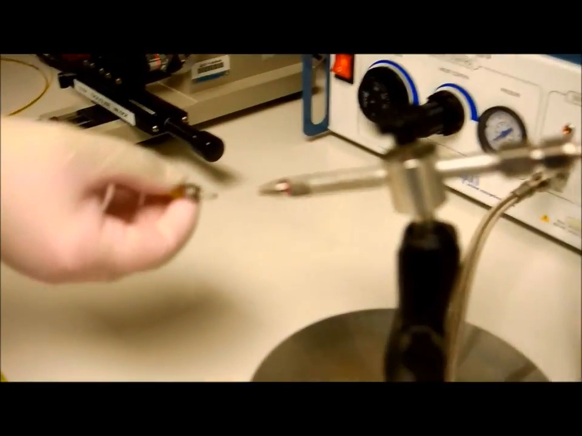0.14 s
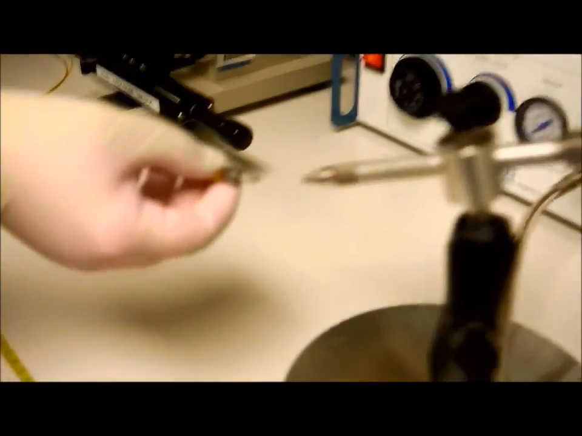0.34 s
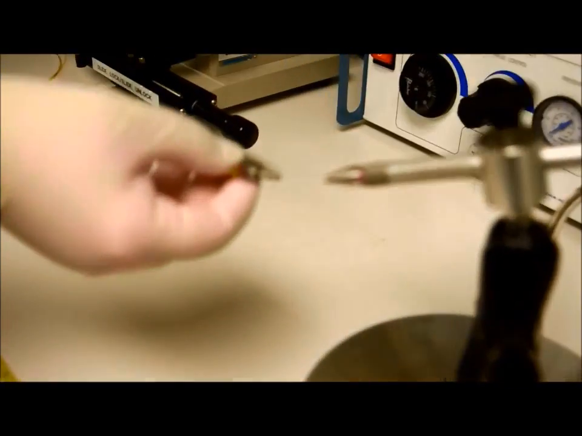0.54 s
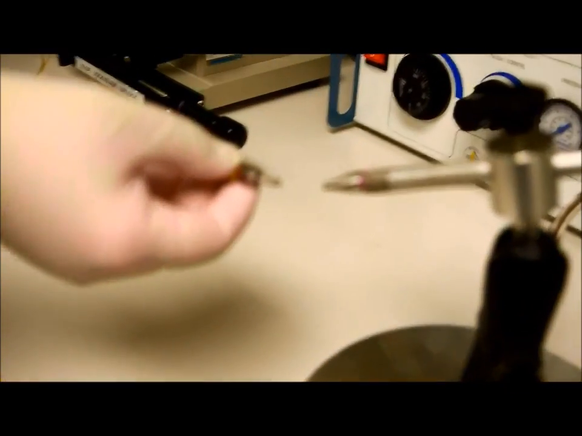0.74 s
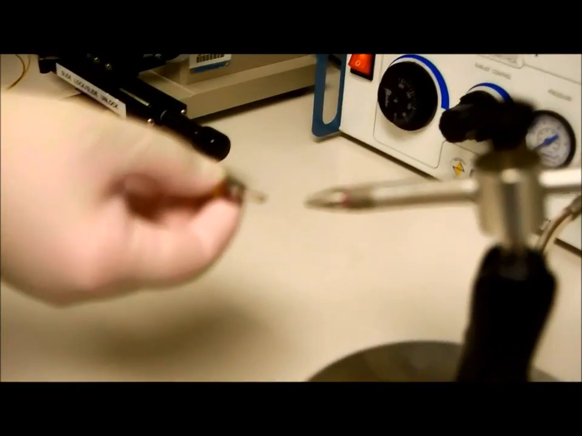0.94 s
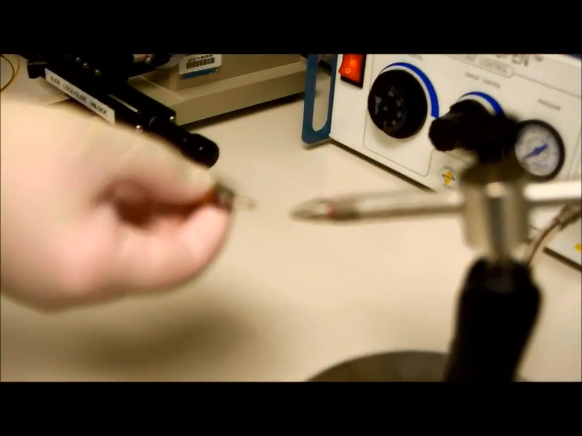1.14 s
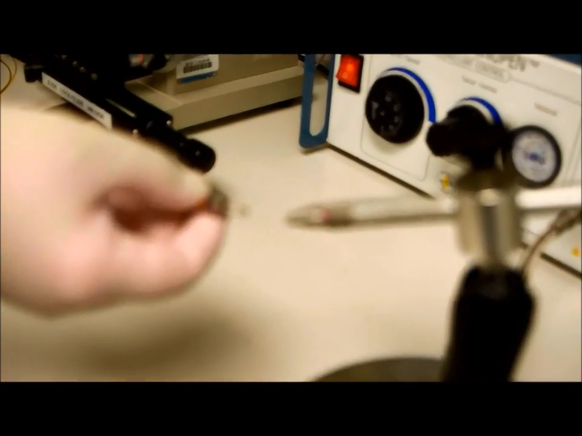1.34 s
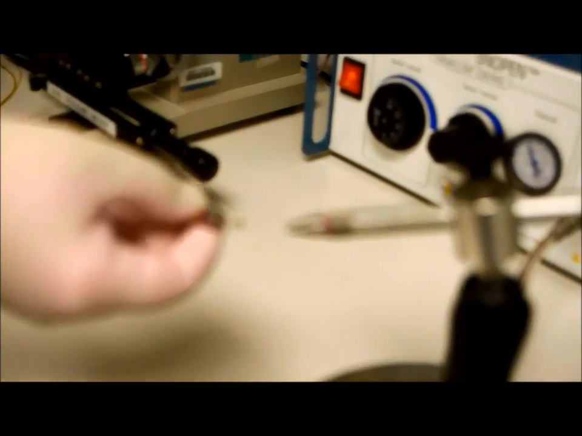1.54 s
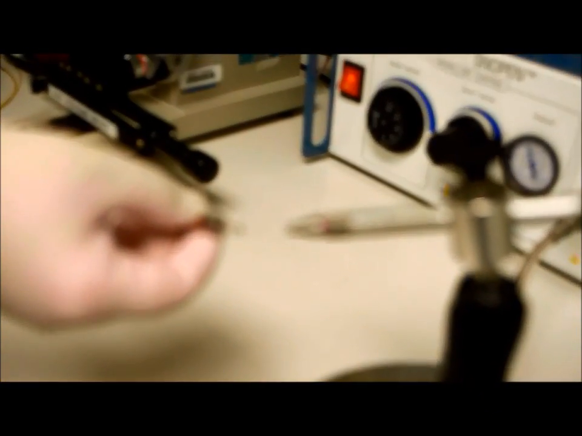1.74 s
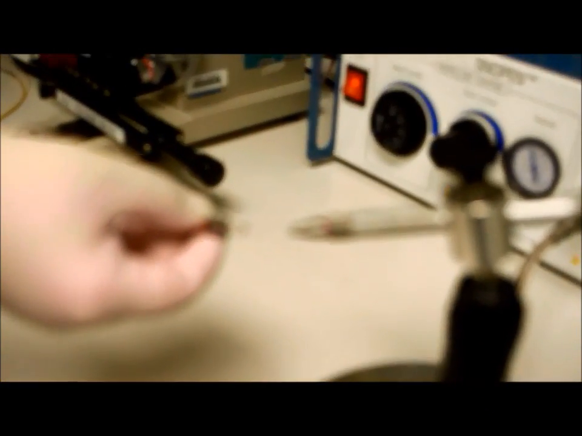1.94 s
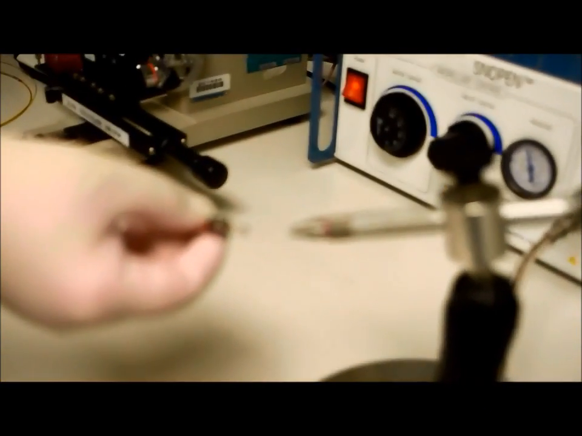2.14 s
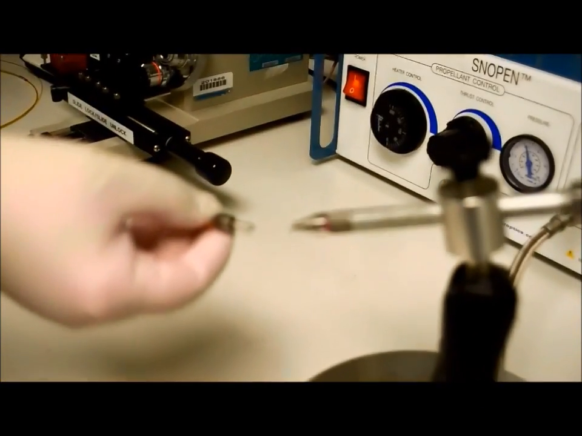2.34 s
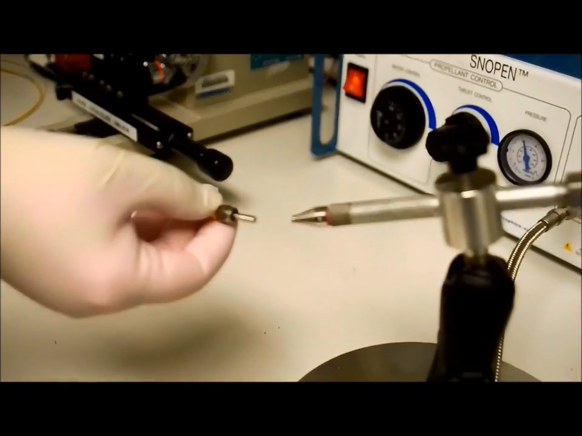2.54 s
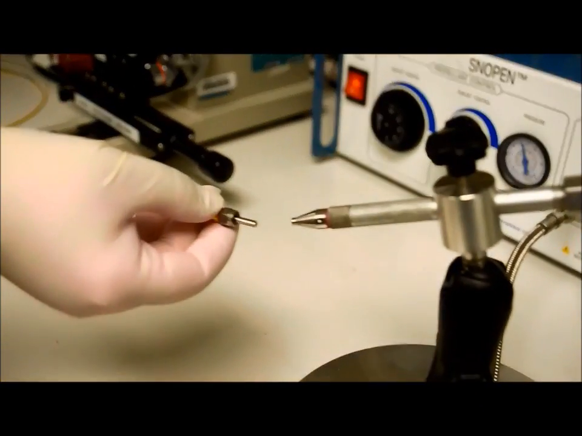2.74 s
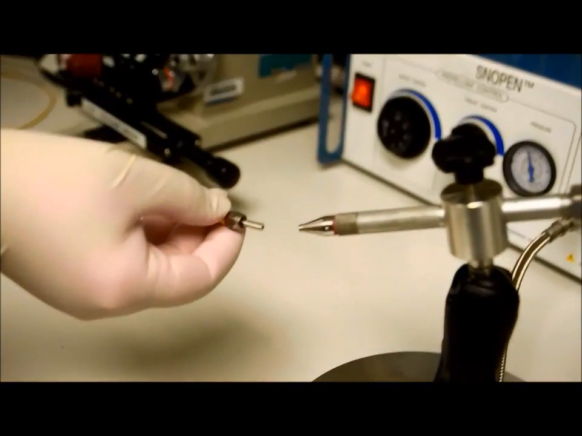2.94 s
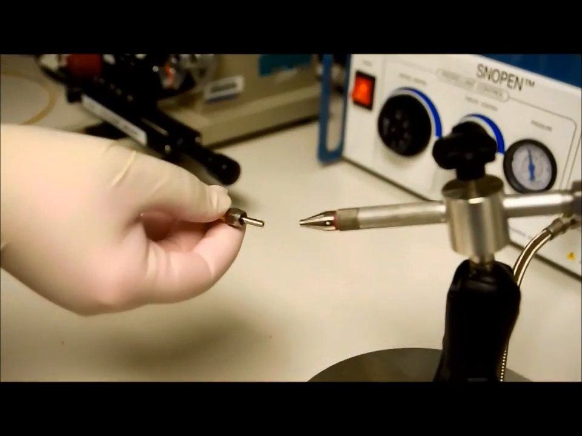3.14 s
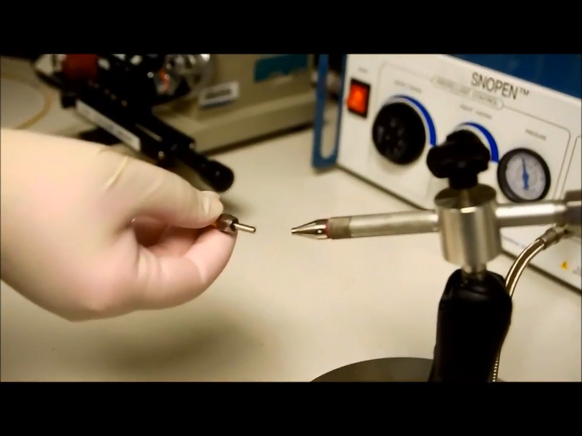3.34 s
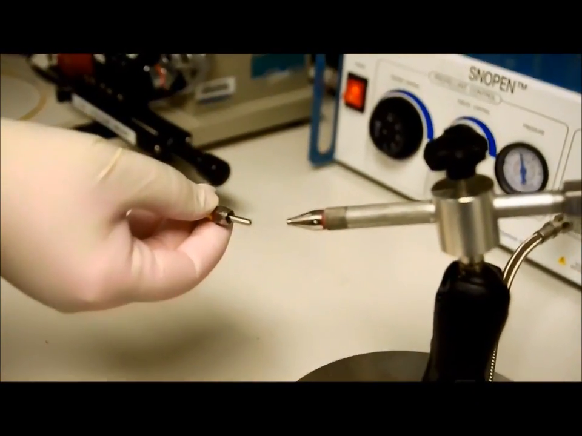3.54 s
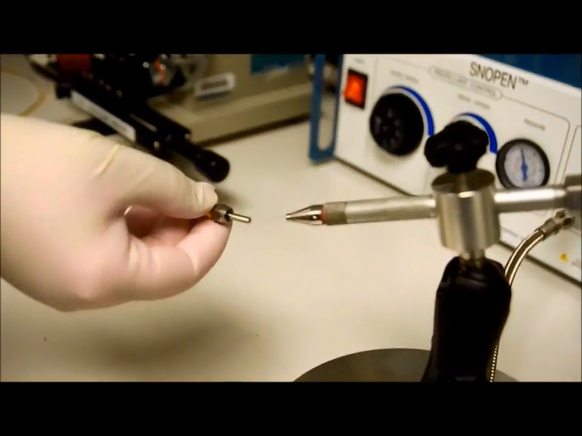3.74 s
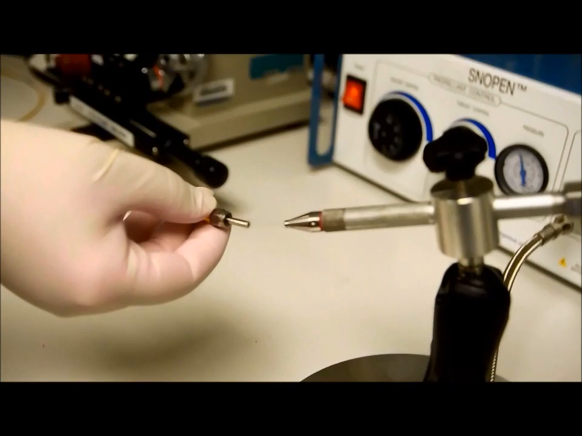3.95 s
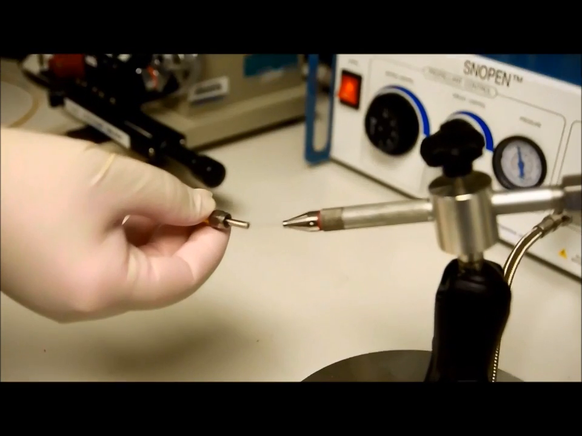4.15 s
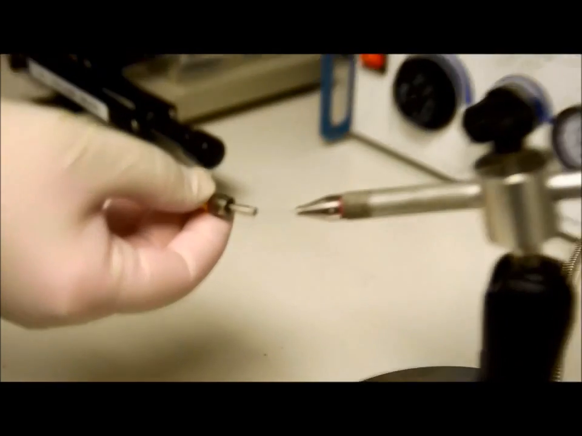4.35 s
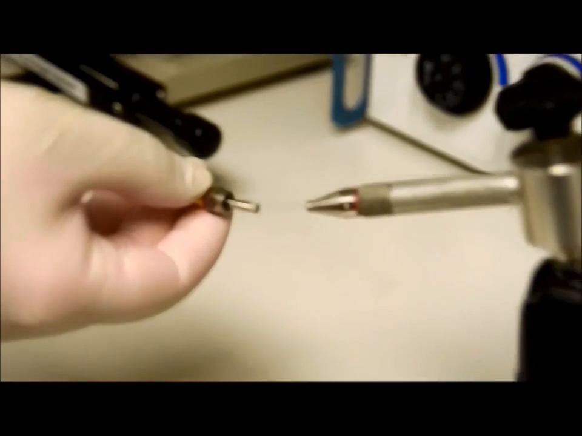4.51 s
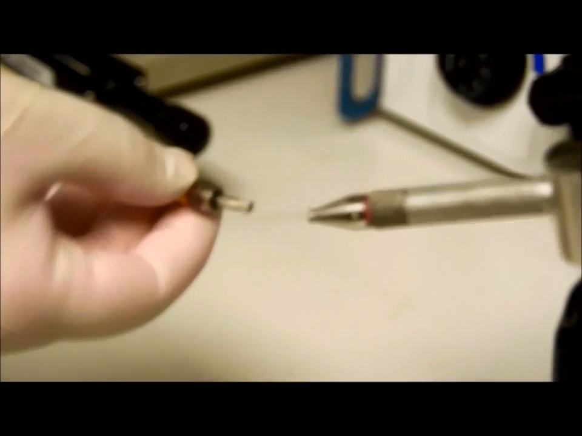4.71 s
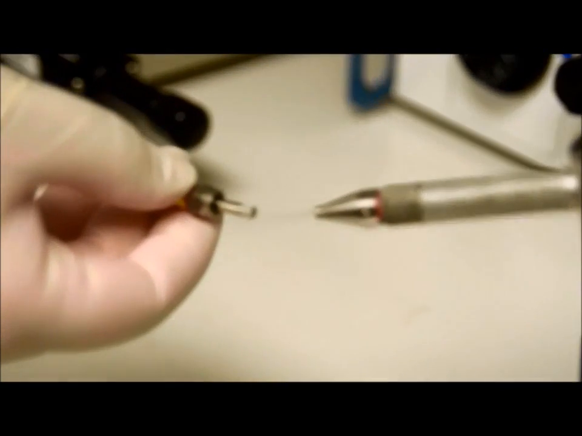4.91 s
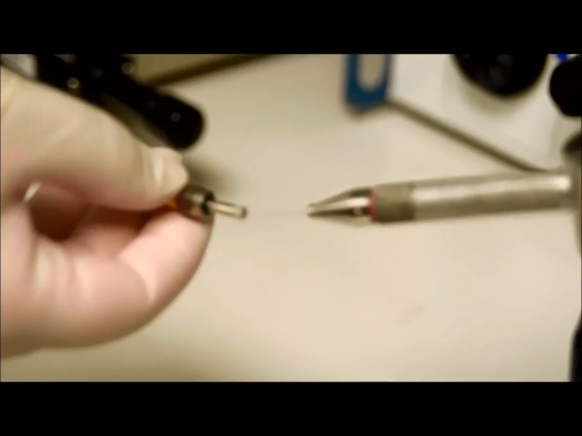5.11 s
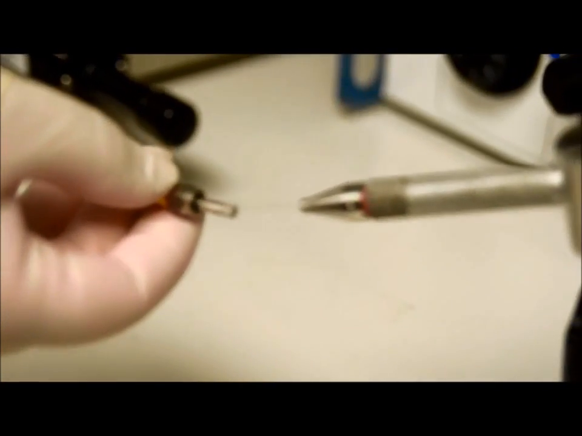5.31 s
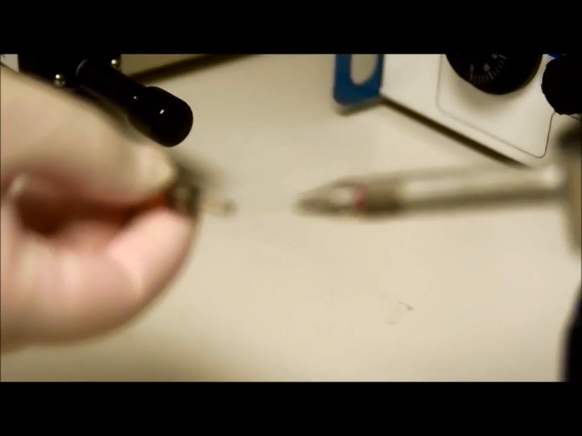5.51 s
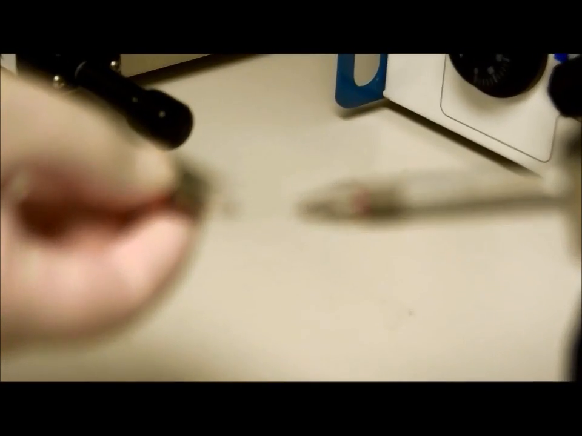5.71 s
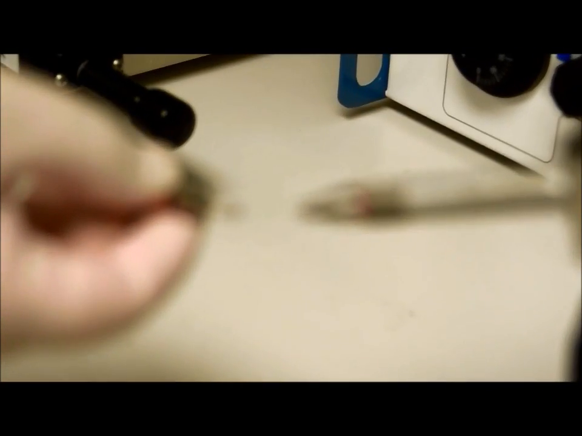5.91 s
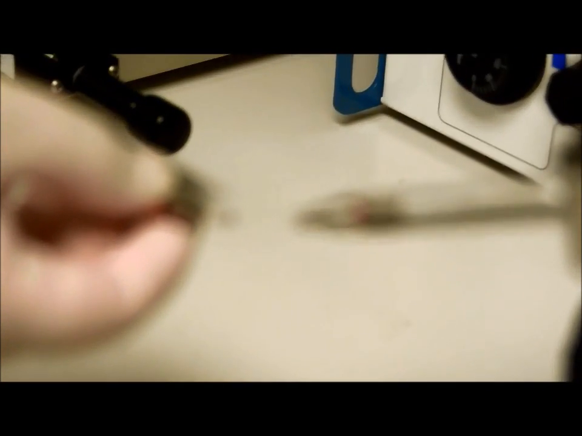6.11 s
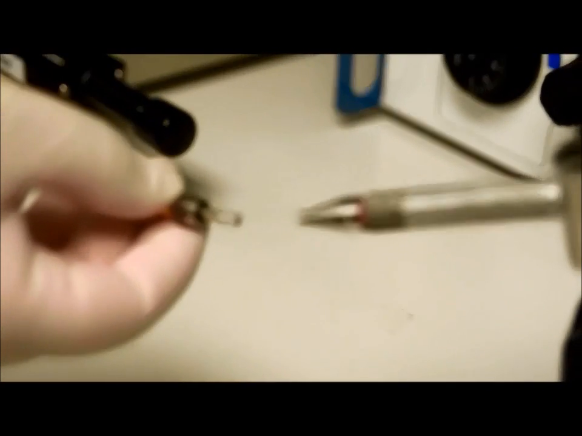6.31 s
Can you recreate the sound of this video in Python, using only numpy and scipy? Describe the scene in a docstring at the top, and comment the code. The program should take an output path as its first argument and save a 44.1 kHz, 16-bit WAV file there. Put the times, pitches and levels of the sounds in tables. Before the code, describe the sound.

For the first second there is only the steady rush of lab ventilation with a low electrical hum and a very faint high whine. At about 1.2 seconds a pedal gives a dull tick, and a valve snaps open with a quick cluster of sharp metallic clicks. By 1.3 seconds a fine nozzle is blowing a loud jet of gas close to the microphone, and the room noise sinks away. The jet is a bright, high hiss over a lower roar where the flow breaks on a small part. Their balance shifts as the part is turned, with a few faint low puffs of air. The pressure eases after 4 seconds and sags near 4.6, leaving a weaker, duller rush. The valve clicks again at about 4.8 seconds, and by 5 the full hiss is back, blowing until the end at about 6.4 seconds.

```python
"""A gas jet blowing at a small part in a lab room, heard close by on one small microphone.
Ventilation, mains hum and a screen whine fill the room. A pedal ticks, a valve snaps open, and a fine
nozzle blows loudly while the room noise sinks. The free jet hisses high, the flow breaking on the part
roars lower, and their balance shifts as the part is turned. Near 4.6 s the pressure sags; the valve
clicks again and the jet comes back to blow to the end."""
import sys
import numpy as np
from scipy import signal
from scipy.fft import rfft, irfft
from scipy.io import wavfile
from scipy.ndimage import uniform_filter1d

SR = 44100
rng = np.random.default_rng(int(sys.argv[2]) if len(sys.argv) > 2 else 0)


def dump_mix(stems):
    """Bounce the given channels to the path in sys.argv[1] as a 16-bit WAV at rate SR."""
    frames = np.atleast_2d(stems).T  # one column per channel
    limited = np.clip(frames, -1, 1)  # hard clip at full scale
    pcm = np.round(limited * 32767).astype(np.int16)
    wavfile.write(sys.argv[1], SR, pcm)


N = 280917


def from_db(db):
    return 10 ** (np.asarray(db) / 20)


def rms_one(x):
    return x / np.sqrt(np.mean(x ** 2) + 1e-20)


def in_time(rows):
    """One curve a column, running straight between the timed rows."""
    times, *columns = np.transpose(rows)
    return [np.interp(np.arange(N) / SR, times, column) for column in columns]


def held(rows, glide_s):
    """One curve a column: each timed row holds, then glides into the next."""
    times, *columns = np.transpose(rows)
    row = np.clip(np.searchsorted(times, np.arange(N) / SR) - 1, 0, None)
    return [uniform_filter1d(column[row], int(glide_s * SR) + 1, mode="nearest") for column in columns]


def drift(rate_hz):
    """A slow random wander of rms about 1, computed at every 40th sample."""
    r = np.exp(-80 * np.pi * rate_hz / SR)
    slow = signal.lfilter([1], [1, -2 * r, r * r], rng.standard_normal(N // 40 + 2002))[2000:]
    return np.interp(np.arange(N) / 40, np.arange(len(slow)), rms_one(slow))


def ring(drive, hz, t60):
    """One damped mode: a unit click sets a sine of height 1 ringing."""
    r, w = from_db(-60 / (t60 * SR)), 2 * np.pi * hz / SR
    return signal.lfilter([0, np.sin(w)], [1, -2 * r * np.cos(w), r * r], drive + 1e-18)


def turbulence(spectrum, patchy_db=0., bands=8):
    """Noise of the given colour whose bands swell by patchy_db, partly together, partly alone; rms 1."""
    hz = np.fft.rfftfreq(N, 1 / SR) + 1
    points_hz, points_db = np.transpose(spectrum)
    shape = from_db(np.interp(np.log(hz), np.log(points_hz), points_db, -90, -90))
    colour = rfft(rng.standard_normal(N)) * shape
    place = np.log(hz / points_hz[0]) / np.log(points_hz[-1] / points_hz[0]) * (bands - 1)
    together, out = drift(3.9), 0
    for k in range(bands):
        band = irfft(colour * np.clip(1 - np.abs(place - k), 0, 1), N)
        out = out + band * from_db(patchy_db * (0.46 * together + drift(20.0)))
    return rms_one(out)


def tone(hz, db, waver_db):
    """A sine of steady pitch whose strength wavers about that rms level."""
    return from_db(db + waver_db * drift(5)) * np.sqrt(2) * np.sin(2 * np.pi * hz * np.arange(N) / SR)


def room_noise():
    """Ventilation rush, a duct tone, mains hum and a screen whine; all sink once the jet is on."""
    # Each row: frequency in Hz, relative noise density in dB.
    ventilation = [(25, -36), (60, -16), (110, -16), (180, -5.5), (344, -5.5), (800, -7.5), (1180, -12),
                   (2300, -18), (3200, -28.5), (4200, -32.5), (5500, -35.5), (8500, -41.5), (10200, -50.5),
                   (14400, -72)]
    # Each row: time in seconds, level of the rush in dB.
    rush_levels = [(0, -31), (1.31, -30.5), (1.36, -47), (2.3, -35.5), (3.1, -51.5), (4.7, -49),
                   (4.9, -42.5), (6.37, -42)]
    level_db, = in_time(rush_levels)
    duct_width_hz = 15
    duct = ring(rng.standard_normal(N), hz=344, t60=np.log(1000) / np.pi / duct_width_hz)
    hum = tone(hz=119.8, db=-48, waver_db=1.5)
    whine = tone(hz=15735, db=-67, waver_db=4)
    tones = from_db(-42.5) * rms_one(duct) + hum + whine
    rush = turbulence(ventilation, patchy_db=.5, bands=10)
    return from_db(level_db) * rush + from_db(level_db - level_db[0]) * tones


def pedal():
    """A soft contact of about 0.3 ms gives a dull tick just before the valve."""
    at_s, peak_db = 1.195, -19
    touch = np.exp(-((np.arange(N) / SR - at_s) / .0001) ** 2)
    tick = ring(touch, hz=1500, t60=.018)
    return from_db(peak_db) * tick / np.abs(tick).max()


def jet():
    """Gas leaks, then gushes as the valve seat clears; pose and pressure balance five regions of flow."""
    # The colours of the five regions. Each row: frequency in Hz, relative noise density in dB.
    free_jet = [(3800, -37), (4900, -6.5), (5400, -8), (6200, -2), (8000, -1.5), (10200, -3), (11000, -7),
                (12500, -23), (15000, -40)]
    fine_sizzle = [(9000, -20), (11000, -2.5), (12000, 3.5), (13500, -6), (14800, -4), (15600, -15),
                   (17000, -18)]
    roar_round_part = [(1300, -14.5), (2000, -5.5), (2400, -2), (3100, 0.5), (3500, -4), (4000, -12),
                       (6000, -33)]
    rush_off_edge = [(2400, -57), (3300, -6), (3800, -1), (4400, -1.5), (4800, -3), (5300, -5), (7000, -17)]
    low_rumble = [(25, -28), (60, -24), (130, -16.5), (300, -8.5), (600, -4), (1000, 1.5), (1800, 0.5),
                  (2300, -1), (3200, -12)]
    # The part is turned. Each row: start in seconds, then base levels in dB for the five regions above.
    poses = [(1.27, -12, -24, -23, -23.5, -22), (1.35, -12.5, -23.5, -23, -19, -23),
             (1.6, -12.5, -22, -26.5, -21.5, -23.5), (2.55, -12.5, -23, -25.5, -20, -23.5),
             (2.78, -12.5, -25.5, -21.5, -25.5, -24), (3.3, -12.5, -25, -22.5, -23, -25),
             (3.9, -13.5, -24.5, -21, -24, -24.5), (4.52, -14, -23, -22, -19.5, -29.5),
             (4.8, -13, -21, -22.5, -21.5, -24), (5.1, -13.5, -22, -23.5, -20.5, -24.5),
             (5.6, -13.5, -21, -21.5, -22.5, -24.5), (6.05, -13, -21.5, -23, -22, -23.5)]
    # Pressure builds, surges, sags and returns. Each row: time in seconds, share of full pressure.
    nozzle_pressure = [(1.27, .1), (1.31, 0.51), (1.37, 0.79), (1.45, 0.78), (1.55, 1.03), (1.8, 0.93),
                       (2.3, 0.97), (3.5, 0.89), (3.7, 1.03), (3.85, 0.93), (4.45, 0.71), (4.57, 0.5),
                       (4.63, 0.16), (4.75, .05), (4.79, .3), (4.86, 0.26), (4.97, .9), (5.17, 0.9),
                       (5.28, 1.07), (5.5, 0.89), (6.37, 0.91)]
    # Each row: share of full pressure, then the dB it adds to each of the five regions.
    pressure_law = [(0, -13, -21, 4.5, 3, 3), (.35, -7, -9.5, 4.5, 4, 1.5), (.7, -2.5, -1, 2.5, 3.5, -1),
                    (1, 0, -1, -0.5, 0, 0.5), (1.2, 5.5, 0, -5.5, 2, 0.5)]
    # The first leak, between the valve clicks. Each row: time in seconds, gain in dB.
    leak_gains = [(1.231, -52), (1.237, -24), (1.245, -25), (1.248, -14), (1.262, -19), (1.274, -26),
                  (1.285, -40), (1.3, -80)]
    open_s, seat_clear_s, roar_build_s, turn_s = 1.272, 0.011, 0.02, .08
    gush_s, gush_rise_s, gush_fall_s = 1.295, 0.014, 0.047
    t = np.arange(N) / SR

    pressure, = in_time(nozzle_pressure)
    shares, *laws = np.transpose(pressure_law)
    pressure_db = [np.interp(pressure, shares, law) for law in laws]
    free_db, sizzle_db, roar_db, edge_db, rumble_db = np.add(held(poses, turn_s), pressure_db)
    # The first gush swells the roar and holds back the edge rush.
    gush_age = np.clip(t - gush_s, 0, None)
    gush_db = 3.5 * np.minimum(gush_age / gush_rise_s, 1) * np.exp(-(gush_age / gush_fall_s) ** 2)
    roar_db += gush_db
    edge_db -= 0.41 * gush_db

    free = turbulence(free_jet, patchy_db=0.5)
    edge = turbulence(rush_off_edge, patchy_db=0.75, bands=5)
    roar = turbulence(roar_round_part, patchy_db=0.64, bands=5)
    rumble = turbulence(low_rumble, patchy_db=1.18)
    sizzle = turbulence(fine_sizzle, patchy_db=1.6, bands=5)

    leak_db, = in_time(leak_gains)
    leaking = t > leak_gains[0][0]
    leak = leaking * from_db(leak_db) * (free + 0.56 * edge + 0.57 * roar + 0.46 * rumble + 0.062 * sizzle)
    opened = np.clip((t - open_s) / seat_clear_s, 0, 1)
    roaring = np.clip((t - open_s) / roar_build_s, 0, 1)
    flow = from_db(free_db) * free + from_db(sizzle_db) * sizzle
    flow += roaring * from_db(roar_db) * roar + from_db(edge_db) * edge + from_db(rumble_db) * rumble
    return leak + opened * flow


def valve():
    """Each click is a short rattle of contacts ringing the valve's modes, plus a crack without bass."""
    # Each row: start in seconds, peak of the ring in dB, length factor, crack gain in dB against the ring.
    clicks = [(1.2353, 0, .3, -38), (1.2452, 4, 1.3, -17), (1.2505, -6, 1.1, -22), (1.277, -15, .8, -14),
              (4.7733, -1, 1.2, -36)]
    # Each row: frequency in Hz, gain in dB, seconds to fall 60 dB at length factor 1.
    modes = [(2680, -19, .016), (4500, -15, .012), (6750, -19, .02), (7500, -13, .03), (8200, -2, .02),
             (8550, 0, .025), (10000, -22, .02)]
    out, t = np.zeros(N), np.arange(SR // 8) / SR
    no_bass = signal.butter(2, 700, "high", fs=SR, output="sos")
    soft_top = signal.butter(2, 11000, fs=SR, output="sos")
    for start_s, peak_db, length, crack_db in clicks:
        contact = np.exp(-t / (.0012 * length)) * np.minimum(t / .0006, 1)
        rattle = signal.sosfilt(soft_top, rng.standard_normal(len(t)) * contact)
        ringing = sum(from_db(db) * ring(rattle, hz, t60 * length) for hz, db, t60 in modes)
        crack = signal.sosfilt(no_bass, rng.standard_normal(len(t)) * np.exp(-t / .003))
        click = ringing / np.abs(ringing).max() + from_db(crack_db) * crack
        start = round(start_s * SR)
        out[start:start + len(t)] += from_db(peak_db) * click
    return out


def puffs():
    """Short low swells of pushed air."""
    # Each row: start in seconds, level at the crest in dB, length in seconds.
    swells = [(1.267, -30, 0.048), (2.67, -34, 0.089), (3.683, -39, 0.11), (4.768, -29.5, .036),
              (5.265, -32.5, 0.1)]
    # Each row: frequency in Hz, relative noise density in dB.
    colour = [(90, -23), (160, 2), (250, -4), (500, 5), (900, -26), (1500, -27)]
    envelope, t = np.zeros(N), np.arange(N) / SR
    for start_s, db, length_s in swells:
        progress = np.clip((t - start_s) / length_s, 0, 1)
        envelope += from_db(db) * np.sin(np.pi * progress) ** .5 * (t < start_s + length_s)
    return envelope * turbulence(colour, bands=2)


def lab(direct, t60=.25, wet_db=-12):
    """Bench and walls answer with a dense decaying tail; the total power is kept."""
    t = np.arange(SR // 2) / SR
    tail = rng.standard_normal(len(t)) * from_db(-60 * t / t60) * (t > .002)
    reverb = signal.fftconvolve(direct, tail / np.sqrt(np.sum(tail ** 2)))[:N]
    wet = from_db(wet_db)
    return (direct + wet * reverb) / np.sqrt(1 + wet ** 2)


def scene():
    """The nearby sources in the lab over the room noise, the same in both channels."""
    mono = lab(jet() + valve() + pedal() + puffs()) + room_noise()
    return np.array([mono, mono])


def record(dry):
    """The microphone's housing colours the sound; the loudest peaks round off and the top is cut."""
    # The housing's resonances. Each row: centre in Hz, width in Hz, gain in dB.
    housing_colour = [(1203, 280, -3.5), (4890, 210, -4), (5410, 150, 4), (6960, 910, 1.5), (8570, 130, 3),
                      (10050, 650, 1.5), (13400, 200, 9), (14100, 300, 5), (15700, 400, 3)]
    housing_rings = [(1136, 70, 4), (1404, 70, 4.5), (2500, 90, 4.5), (2723, 50, 3.5), (3273, 90, 4),
                     (4107, 70, 4.5), (4673, 100, 4.5), (4905, 80, 3)]
    housing_nulls = [(5680, 330, -13), (6900, 130, -12), (15010, 350, -12)]
    for hz, width_hz, db in housing_colour + housing_rings + housing_nulls:
        gain, w = from_db(db / 2), 2 * np.pi * hz / SR
        damping = np.sin(w) * width_hz / hz / 2
        forward = [1 + damping * gain, -2 * np.cos(w), 1 - damping * gain]
        feedback = [1 + damping / gain, -2 * np.cos(w), 1 - damping / gain]
        dry = signal.lfilter(forward, feedback, dry)
    ceiling, cutoff_hz = .97, 15760
    rounded = dry / (1 + (dry / ceiling) ** 8) ** (1 / 8)
    steep_cut = signal.ellip(14, .3, 85, cutoff_hz, fs=SR, output="sos")
    return np.clip(signal.sosfilt(steep_cut, rounded), -1, 1)


dry = scene()
out = record(dry)
dump_mix(out)
```